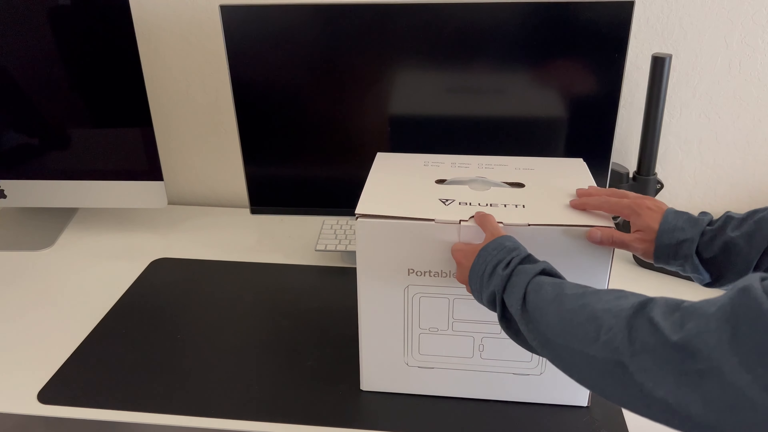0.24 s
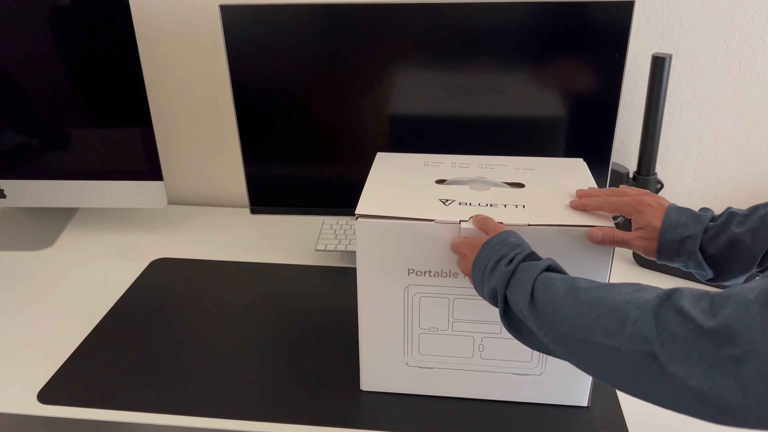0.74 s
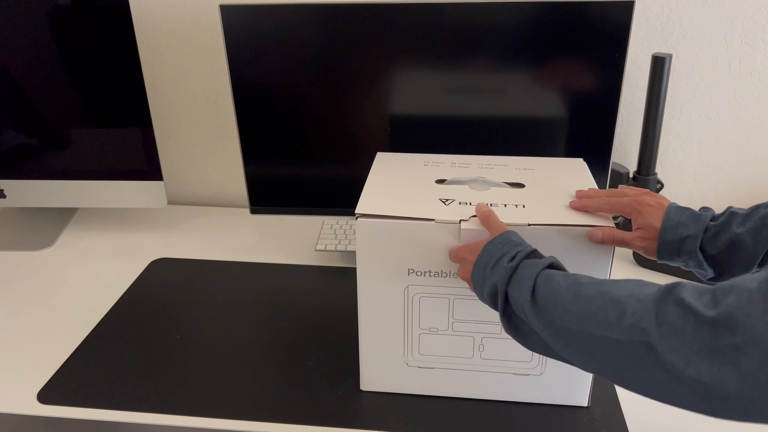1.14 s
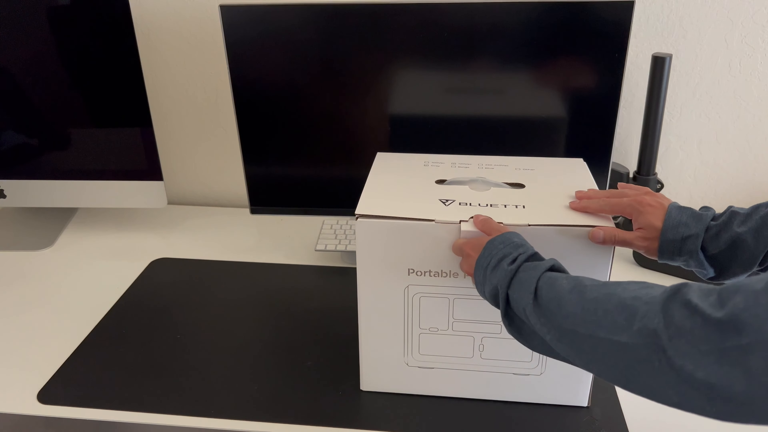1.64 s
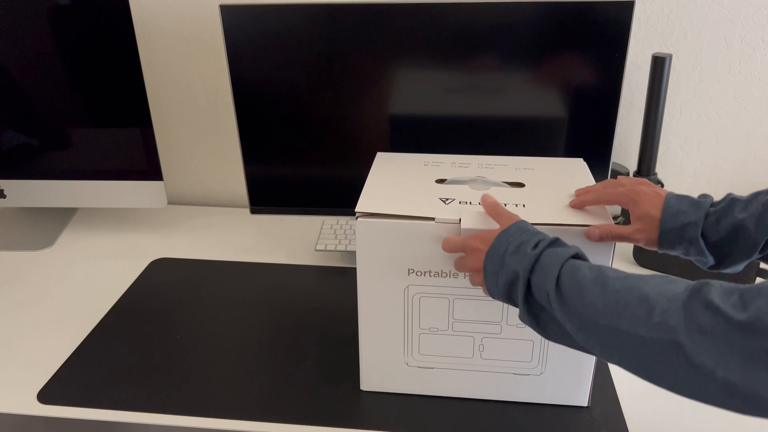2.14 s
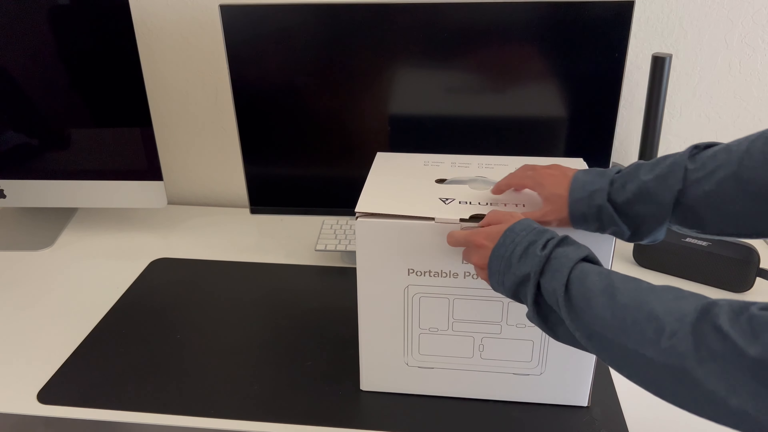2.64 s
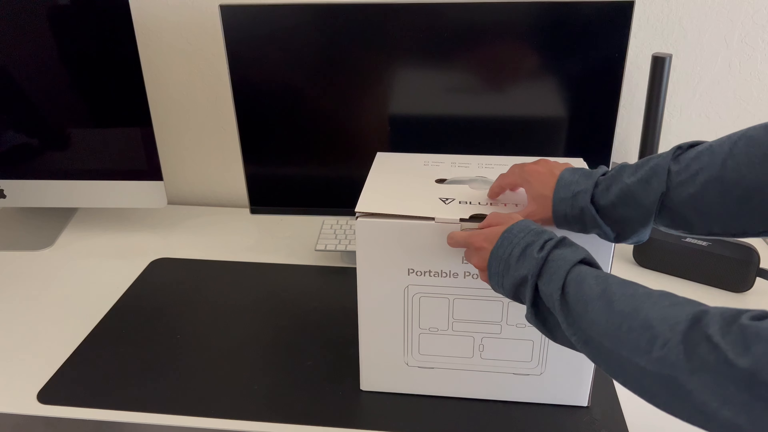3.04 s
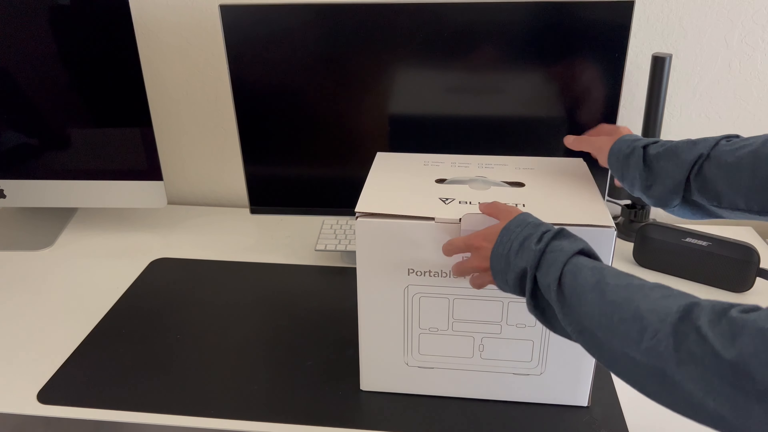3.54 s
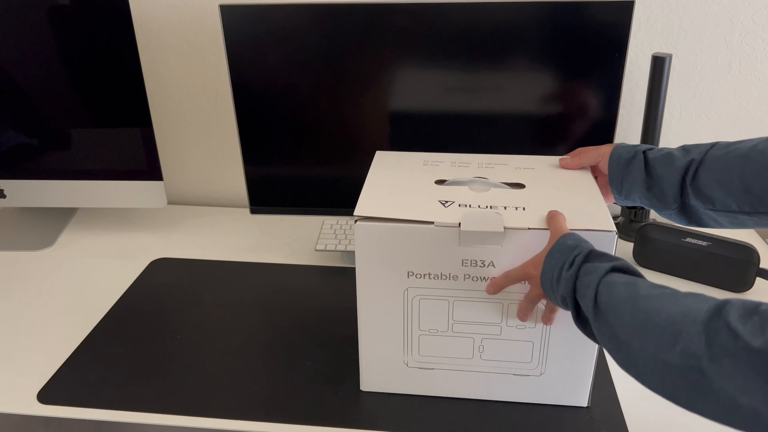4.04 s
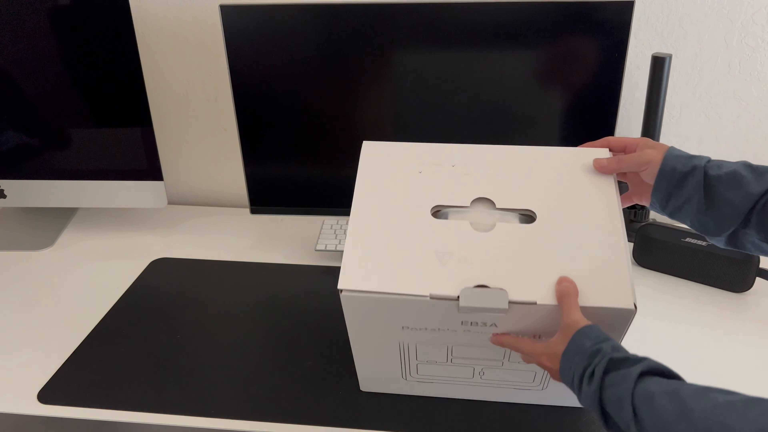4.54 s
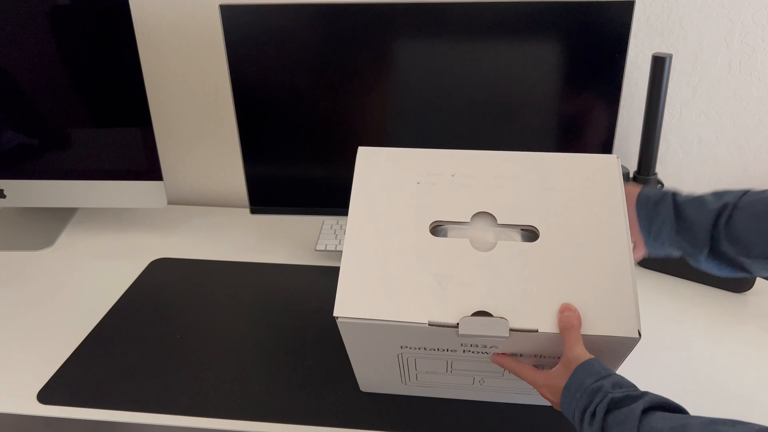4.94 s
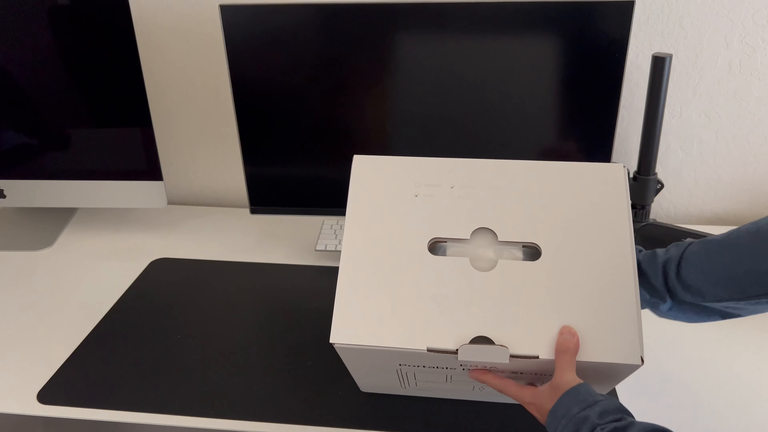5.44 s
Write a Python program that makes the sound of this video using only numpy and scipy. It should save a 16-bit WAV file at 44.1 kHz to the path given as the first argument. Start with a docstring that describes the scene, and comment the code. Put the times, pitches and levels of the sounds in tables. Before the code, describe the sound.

Fingers rub and pry at a cardboard box lid, snapping its tab loose with a long scrape, then tip the box softly in a quiet room.

```python
"""Cardboard box on a desk

Small quiet room, box close to a phone-size pair of microphone ports. Fingers rub the lid and work its tab
loose with snaps and a long scrape, tap the panels and tip the box over: noise bursts and friction noise
drive resonances of card, decaying sines make the hollow thumps, and low noise is the box rocking.
Behind it lie shaped noise for room rumble and faint hiss, a wavering low hum, wall echoes and a short tail."""
import sys
import numpy as np
from scipy import signal
from scipy.fft import rfft, irfft, next_fast_len
from scipy.io import wavfile
from scipy.ndimage import uniform_filter1d, map_coordinates

SR = 44100
rng = np.random.default_rng(int(sys.argv[2]) if len(sys.argv) > 2 else 0)


def persist_wave(psi):
    """Save psi, clipped to +-1, as 16-bit WAV."""
    counts = np.round(np.clip(psi, -1, 1) * 32767).astype(np.int16)
    wavfile.write(sys.argv[1], SR, np.atleast_2d(counts).T)


N = 250399  # length in samples


def amp(db):
    """Gain of a level in dB."""
    return 10 ** (np.asarray(db) / 20)


def unit(x):
    """Scaled to rms 1."""
    return x / np.sqrt(np.mean(x ** 2) + 1e-20)


def along(points, hz):
    """Value at each frequency, joining (Hz, value) points on a log frequency axis."""
    point_hz, values = np.transpose(points)
    return np.interp(np.log(hz + 1), np.log(point_hz + 1), values)


def wobble(rate):
    """A smooth random curve with rate knots a second."""
    knots = rng.standard_normal(int(N * rate / SR) + 4)
    return map_coordinates(knots, [np.arange(N) * rate / SR])


def filtered(x, response):
    """x times a complex response of frequency."""
    size = next_fast_len(x.shape[-1] + 8192)
    spectrum = rfft(x, size) * response(np.fft.rfftfreq(size, 1 / SR))
    return irfft(spectrum, size)[..., :x.shape[-1]]


def modes(table):
    """Causal response of (Hz, width Hz, dB) resonances, summed with alternating sign."""
    def response(f):
        total = 0
        for k, (centre, width, db) in enumerate(table):
            damping = 1j * f * width
            total = total + (-1) ** k * amp(db) * damping / (centre * centre - f * f + damping)
        return total
    return response


def lowpass(hz, corner_hz, order):
    """Real roll-off above a corner."""
    return 1 / (1 + (hz / corner_hz) ** order)


def highpass(hz, corner_hz, order):
    """Real roll-off below a corner."""
    return 1 / (1 + (corner_hz / (hz + 1)) ** order)


SWING_DB = 30  # a swell climbs and a fade falls this far in its time


def swelling(s, swell, hold, fade):
    """Gain of a gesture: it climbs, holds and falls evenly in dB."""
    t = np.arange(N) / SR
    before = np.maximum(s - t, 0) / max(swell, .002)
    after = np.maximum(t - s - max(hold, 0), 0) / max(fade, .002)
    return amp(-SWING_DB * (before + after))


# Room air, spectrum of rumble and hiss: pitch_hz, level_db (relative, per Hz)
AIR_SPECTRUM = [(18, -28.5), (27, -18.5), (40, -3), (60, 1), (100, -4.5), (128, -4), (170, -13.5),
                (400, -21), (800, -34), (1500, -43), (2050, -32.5), (2600, -40.5), (5500, -50), (7100, -41),
                (8500, -56), (13000, -41), (16000, -46)]
# Room air, likeness of left and right: pitch_hz, likeness (1 = the same)
AIR_LIKENESS = [(40, 0.93), (200, 0.61), (700, 0.25), (3000, 0.06)]
# Room air, lean to one side: pitch_hz, left_over_right_db
AIR_LEAN = [(100, -1.5), (1000, 2), (3500, 3.5), (6000, 7), (7000, 12), (8500, 9.5), (10000, -1.5)]
AIR_DB = -61.5  # rms of the pair on its way to the ports


def air():
    """Rumble of the building and a thin hiss: noise whose level drifts in patches of time and frequency."""
    spectra = signal.stft(rng.standard_normal((2, N + 512)), nperseg=512)[2]
    patches = uniform_filter1d(rng.standard_normal(spectra.shape[1:]), 6, axis=0)
    patches = uniform_filter1d(patches, 14, axis=1)
    pair = signal.istft(spectra * amp(1.8 * unit(patches)), nperseg=512)[1][:, :N]

    def mid_side(hz):
        # turning the pair from mid towards side makes the two channels less alike
        turn = np.arccos(np.clip(along(AIR_LIKENESS, hz), -1, 1)) / 2
        return amp(along(AIR_SPECTRUM, hz)) * [np.cos(turn), np.sin(turn)]

    mid, side = filtered(pair, mid_side)
    lean = lambda hz: amp(along(AIR_LEAN, hz) * np.array([[.5], [-.5]]))
    return amp(AIR_DB) * unit(filtered(np.array([mid + side, mid - side]), lean))


# Wavering low hum, straight lines between points: time_s, level_db (before a common trim)
HUM_LEVEL = [(0.0, -90), (0.14, -54), (0.3, -94), (0.49, -55), (0.77, -70.5), (2.398, -82), (2.56, -55.5),
             (2.722, -64.5), (3.241, -65.5), (3.54, -91), (3.98, -55.5), (4.191, -79), (5.089, -65.5),
             (5.469, -55.5), (5.68, -57.5)]
HUM_HZ = 126.3


def hum():
    """A narrow band of noise that swells and sinks."""
    time_s, level_db = np.transpose(HUM_LEVEL)
    band = filtered(rng.standard_normal(N), modes([(HUM_HZ, 9, 0)]))
    return amp(np.interp(np.arange(N) / SR, time_s, level_db) - 3.5) * unit(band)


# Box rocking on the desk: full_at_s, level_db (before a common trim), swell_s, fade_s
ROCKING = [(.12, -65.5, 0.35, 0.27), (.52, -61.5, 0.16, 0.71), (1.79, -56, 0.56, 0.25),
           (2.14, -68.5, 0.39, 0.51), (3.15, -58.5, 0.043, 0.15), (3.97, -59.5, 0.2, 0.66),
           (4.39, -60.5, 0.041, 0.12), (4.57, -71, 0.064, .6), (4.85, -55, 0.1, 0.11),
           (5.08, -63, 0.22, 0.78), (5.45, -48, .04, 0.11), (5.66, -64.5, 0.44, 0.19)]
RESTING_DB = -80.5  # the box creaks faintly under the hands; same trim as the rocking


def shifting():
    """The whole box moves on the desk: lumpy noise in its lowest air mode."""
    level = amp(RESTING_DB)
    for s, db, swell, fade in ROCKING:
        level = level + amp(db) * swelling(s, swell, 0, fade)
    air_mode = modes([(270, 170, 0)])
    band = filtered(rng.standard_normal(N), lambda hz: air_mode(hz) ** 2)
    return level * amp(-7 + 1.6 * wobble(25)) * unit(band)


def grit(per_second, spread_db):
    """Tiny slips of uneven but bounded size over smooth friction noise."""
    size_db = spread_db * np.minimum(rng.exponential(size=N), 2)
    slipping = rng.random(N) < per_second / SR
    return rng.standard_normal(N) * (1 + slipping * amp(size_db))


# Box panels: pitch_hz, width_hz, level_db
PANEL_MODES = [(400, 67, 2), (555.5, 91, 4.67), (768, 88, 1), (918, 42, 1.5), (1015.6, 76, -1),
               (1303, 220, -3.5), (1708, 360, -7.5)]
# Stiff edges of the tab: pitch_hz, width_hz, level_db
EDGE_MODES = [(1883, 270, -2.5), (2500, 440, -1.5), (3670, 870, -3.5)]
# Thin lip of the tab: pitch_hz, width_hz, level_db
LIP_MODES = [(4220, 1200, -2), (5090, 480, 3), (6500, 2100, -1.8)]
# Card fibres, spectrum of the top treble: pitch_hz, level_db (relative, per Hz)
FIBRE_SPECTRUM = [(5500, -33.5), (7300, -7.5), (8500, 1.5), (10000, -0.5), (13300, 5), (15000, -0.5),
                  (16000, -19)]
# Strokes of fingers and tab: full_pressure_at_s, swell_s, hold_s, fade_s, pressure_db (before layer trims),
# dullness_db (loss per layer from panels up to fibres), lip_share_db (extra for the lip)
FINGER_STROKES = [(0.022, .03, 0.049, 0.27, -60.5, 3.5, -2.5), (0.189, 0.047, 0.043, 0.035, -66.5, 1, -3),
                  (0.296, 0.0074, 0.027, .09, -60, 14, 20), (0.353, .03, .04, 0.33, -59, 11.5, 16),
                  (0.481, .006, .02, 0.15, -57.5, 0.5, 9.5), (0.695, 0.0051, 0.00067, 0.012, -56, 12.5, 14),
                  (0.744, 0.081, 0.0081, 0.055, -62, 7, -1), (0.882, 0.089, 0.014, 0.057, -50.5, 6, -3.5),
                  (1.103, 0.011, 0.0034, 0.13, -56, 2.5, 2.5), (1.298, 0.15, 0.082, 0.058, -63.5, 6.5, -2),
                  (1.461, .1, .002, .02, -67, 4, -16), (1.595, 0.016, 0.21, 0.19, -50, 7.5, -7.5),
                  (1.746, 0.15, 0.018, 0.028, -35, 7, -5), (1.791, 0.049, 0.018, 0.067, -32, 5.5, -5),
                  (2.013, .006, 0.082, .05, -56.5, -1.7, 0), (2.079, 0.18, 0.022, 0.075, -48, 1.96, -4.5),
                  (2.264, 0.24, 0.053, 0.03, -75, 1.5, -6), (2.344, 0.11, .002, 0.16, -65, 6, -7),
                  (2.49, .015, 0.095, 0.21, -68, 1, -4.5), (2.594, 0.12, 0.086, .1, -62.5, 5, -7),
                  (2.762, 0.058, .002, .06, -62, 14, -17), (2.958, 0.099, 0.035, .1, -91.5, -2, -18),
                  (3.198, .02, .002, 0.096, -67.5, 4.5, -15), (3.321, 0.076, 0.029, 0.066, -74, 2.3, 0),
                  (3.596, 0.014, 0.0037, 0.043, -50, 5.5, 5.5), (3.617, .03, .03, 0.082, -89, -4, 12.5),
                  (3.849, .06, .002, 0.039, -75, -2, -8), (3.9, .03, 0.1, 0.41, -90, -3.5, -11),
                  (3.98, 0.18, .002, 0.37, -66, 5.5, -2.5), (4.12, .05, 0.0026, .1, -77, 4.5, -19),
                  (4.22, 0.28, 0.16, .1, -90.5, -1.5, -10.5), (4.478, .012, 0.061, 0.096, -97, 0.9, 20.5),
                  (4.586, 0.062, 0.014, 0.04, -95.5, -5.5, -17), (4.77, .06, 0.022, 0.055, -82, -1.2, -2),
                  (4.846, 0.13, .002, 0.054, -61, 5, -12), (4.985, 0.016, 0.1, 0.02, -71, 6.5, -24.5),
                  (5.078, .012, 0.018, 0.069, -82.5, -1.7, -6), (5.15, 0.011, 0.013, .03, -87, -4.5, -15),
                  (5.196, 0.014, 0.022, .05, -79, -3.5, -3), (5.278, .015, 0.022, .15, -75, -1.6, -2),
                  (5.447, 0.037, 0.003, 0.082, -49, 4.5, -2.5), (5.542, .1, 0.048, 0.054, -72.5, 3.5, 3)]


def rubbing():
    """Skin and card slip over card: the slips shake the panels, the edges, the lip and the fibres."""
    power = np.zeros((4, N))
    for *shape, db, dull_db, lip_db in FINGER_STROKES:
        layers_db = db - dull_db * np.arange(4)
        layers_db[2] += lip_db
        power += (amp(layers_db)[:, None] * swelling(*shape)) ** 2
    # contact builds over a few ms
    drag, scrape, swish, hiss = uniform_filter1d(np.sqrt(power), size=300, axis=1)

    judder = wobble(70)  # the grip catches and lets go
    slips = grit(per_second=1500, spread_db=7.5)
    fine = slips + grit(per_second=100, spread_db=7.5)

    hollow = lambda hz: modes(PANEL_MODES)(hz) * lowpass(hz, 1700, 4) * highpass(hz, 480, 4)
    dull = lambda hz: modes(EDGE_MODES)(hz) * lowpass(hz, 4100, 6)  # card passes little above the edge modes
    thin = lambda hz: modes(LIP_MODES)(hz) * highpass(hz, 4000, 6)
    fibrous = lambda hz: amp(along(FIBRE_SPECTRUM, hz))

    panels = drag * amp(-4.5 + 3.1 * judder) * unit(filtered(slips, hollow))
    edges = scrape * amp(-6.5 + 1.1 * judder + 1.8 * wobble(300)) * unit(filtered(slips, dull))
    lip = swish * amp(-5.5 + 1.9 * judder + 0.9 * wobble(150)) * unit(filtered(fine, thin))
    fibres = hiss * amp(-0.7 + 3.4 * judder + 1.4 * wobble(40)) * unit(filtered(fine, fibrous))
    return panels + edges + lip + fibres


# Snaps and taps: start_s, level_db (layer peak before trim and hardness loss),
# hardness (0 panel knock to 4 tick, may lie beyond), narrowness_db (loss per squared step of hardness)
SNAPS_AND_TAPS = [(.0812, -48, 0.73, -0.1), (.1915, -47, 1.1, 6.5), (.2154, -55.5, 2.5, 1.5),
                  (.2234, -34, 4.67, 10), (.255, -32.5, 3.85, 1), (.2796, -26.5, 3.16, 3.5),
                  (.4408, -22.5, 2.23, 2), (.4722, -22, 2.9, 2.3), (.8619, -51, 1.9, -0.5),
                  (.8789, -33.5, 4.4, 2.5), (1.0762, -36.5, 3.58, 1.76), (1.2865, -53.5, 1.27, 8),
                  (1.4711, -46.5, 0.9, 3), (1.5723, -49, 0.97, 2), (1.6759, -44.5, 2.4, 1),
                  (2.011, -26, 5.27, 5), (2.1044, -40.5, 0.5, 0.2), (2.3174, -44, 0.047, 21),
                  (2.4824, -55.5, 0.053, 3.5), (2.7646, -57, 0.25, 3), (3.1931, -52.5, 0.078, 12),
                  (3.4565, -61, 3.9, 3), (3.6019, -38.5, 4.6, 2), (3.8694, -51.5, 0.15, 22),
                  (3.911, -61, 2.9, 0.5), (4.0741, -49.5, 0.4, 4), (4.1294, -41.5, .01, 10.5),
                  (4.3844, -58.5, 0.067, 8), (4.4081, -54.5, 1.02, 9), (4.5694, -62.5, 0.0092, 9.5),
                  (4.8014, -51, .4, 5.5), (4.8449, -45.5, 1.46, 2.5), (4.852, -43, 1.14, 12),
                  (4.983, -64, 1.3, 3), (5.031, -56.5, 1.3, 8), (5.0689, -58, 2.1, 15),
                  (5.1452, -67, 0.71, 0), (5.1901, -72, 0.48, 1.2), (5.4385, -47.5, 1.7, 5.5)]
# Trim of each layer, in the order knock, ring, crack, snap, tick: level_db
LAYER_TRIM = [.1, -0.014, 0.076, -0.15, -0.042]


def taps():
    """Each contact is a short burst: tick, snap and edge crack first, the panels answer a moment later."""
    out, t = np.zeros(N + SR), np.arange(4096) / SR

    def rise_filter(hz, corner_hz):
        return (1j * hz / corner_hz / (1 + 1j * hz / corner_hz)) ** 3

    knock = lambda hz: modes(PANEL_MODES)(hz) / (1 + 1j * hz / 700) ** 4
    ring = lambda hz: modes(PANEL_MODES)(hz) * rise_filter(hz, 1100) / (1 + 1j * hz / 2200) ** 3
    crack = modes(EDGE_MODES)
    snap = lambda hz: modes(LIP_MODES)(hz) * rise_filter(hz, 4000)
    tick = lambda hz: amp(along(FIBRE_SPECTRUM, hz))
    responses = [knock, ring, crack, snap, tick]
    t60_s, rise_s = [[.004], [.005], [.006], [.006], [.005]], .0005  # of the bursts that drive the layers

    for s, db, hardness, narrow_db in SNAPS_AND_TAPS:
        bursts = rng.standard_normal((5, len(t))) * amp(-60 * t / t60_s) * (1 - np.exp(-t / rise_s))
        bursts[:2] = np.roll(bursts[:2], 30, axis=1)  # knock and ring come 30 samples later
        layers_db = db + np.array(LAYER_TRIM) - narrow_db * (np.arange(5) - hardness) ** 2
        contact = np.zeros(len(t))
        for burst, response, layer_db in zip(bursts, responses, layers_db):
            layer = filtered(burst, response)
            contact += amp(layer_db) * layer / np.abs(layer).max()
        out[round(s * SR):][:len(t)] += contact
    return out[:N]


# Low thumps of the hollow box: start_s, level_db (main tone before its onset and decay), pitch_hz, t60_s
THUMPS = [(2.076, -39.5, 425, 0.098), (2.109, -39, 391, 0.099), (3.189, -47, 123.4, 0.036),
          (3.922, -47.5, 76, 0.11), (4.386, -49, 400, 0.045), (5.445, -33, 270, 0.038)]


def bumps():
    """A soft push makes the air and walls of the box boom for a few cycles."""
    out, t = np.zeros(N + SR), np.arange(SR // 4) / SR
    for s, db, hz, t60 in THUMPS:
        ring = np.sin(2 * np.pi * hz * t) + 0.27 * np.sin(2 * np.pi * 0.75 * hz * t)
        onset = 1 - np.exp(-t / 0.00083)
        out[round(s * SR):][:len(t)] += amp(db - 60 * t / t60) * onset * ring
    return out[:N]


# Decay of the room: pitch_hz, t60_s
ROOM_DECAY = [(200, 0.23), (1000, 0.25), (5500, 0.32), (9000, 0.15), (14000, 0.12)]
# Tone of the tail at its start: pitch_hz, level_db (relative)
TAIL_TONE = [(300, -0.5), (1500, -5), (3500, -4), (6000, 1.5), (8000, -1.5), (14000, -1.5)]
# Echoes of desk and near walls: delay_s, level_db
NEAR_WALLS = [(.00102, -17), (.0058, -12), (0.0136, -18)]


def room(x, tail_db):
    """Near surfaces echo, then a noise tail dies at its own speed per frequency; new tail each 1/8 s."""
    out, step = np.zeros((2, N + SR)), SR // 8
    for start in range(0, N, step):
        hz, t, spectra = signal.stft(rng.standard_normal((2, SR // 3)), SR, nperseg=256)
        fade_db = along(TAIL_TONE, hz)[:, None] - 60 * t / along(ROOM_DECAY, hz)[:, None]
        tail = signal.istft(spectra * amp(fade_db), SR, nperseg=256)[1]
        tail = amp(tail_db) * tail / np.linalg.norm(tail[0])
        tail = np.pad(tail, ((0, 0), (130, 0)))  # the tail starts 130 samples after the direct sound
        for delay, db in NEAR_WALLS:
            tail[:, round(delay * SR)] += amp(db)
        wet = signal.fftconvolve(x[:, start:start + step], tail, axes=1)
        out[:, start:][:, :wet.shape[1]] += wet
    return out[:, :N]


def scene():
    """Hands and box in the room, over its air and hum."""
    box = (taps() + rubbing() + bumps() + shifting())[None]
    return box + room(box, tail_db=-1.0) + air() + hum()


# Phase lead of the left port over the right: pitch_hz, lead_half_cycles
PORT_LEAD = [(0, 0), (2000, 0), (4700, .2), (6500, -.1), (8300, -.4), (9000, -.7), (9500, -1), (10600, -1),
             (11700, -1.45), (12900, -2), (14300, -2), (15700, -3)]
# Gain of the part the two ports do not share: pitch_hz, level_db
UNSHARED = [(100, -4.5), (400, -3.5), (1000, 2.5), (2200, -1), (4000, 0.2), (8600, 1.5), (9500, -25),
            (10500, -28), (11300, 0), (12900, -6.5), (14100, -7), (15000, -3)]
# Level difference of the ports: pitch_hz, left_over_right_db
PORT_SHADE = [(200, -0.5), (1500, 0.3), (3500, 2), (5800, 4.5), (7500, 1.5), (9000, 1)]
TOP_HZ = 16500  # nothing passes from here up


def record(dry):
    """Two ports hear a wave with a phase lead that turns with frequency; then the band limit."""
    mid = (dry[0] + dry[1]) / 2
    side = filtered((dry[0] - dry[1]) / 2, lambda hz: amp(along(UNSHARED, hz)))

    def ports(hz):
        half_cycles = np.interp(hz, *np.transpose(PORT_LEAD))
        lead = np.exp(.5j * np.pi * half_cycles * np.array([[1], [-1]]))
        shade = amp(along(PORT_SHADE, hz) * np.array([[.5], [-.5]]))  # the body shades one port
        return lead * shade * (hz < TOP_HZ)

    return filtered(np.array([mid + side, mid - side]), ports)


dry = scene()
out = record(dry)
persist_wave(out)
```